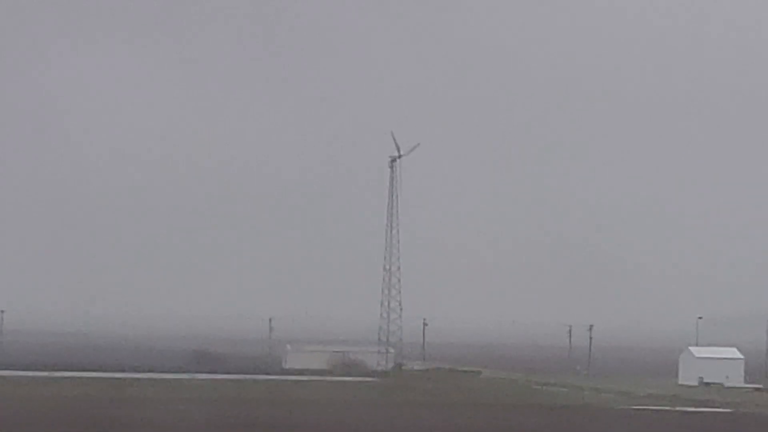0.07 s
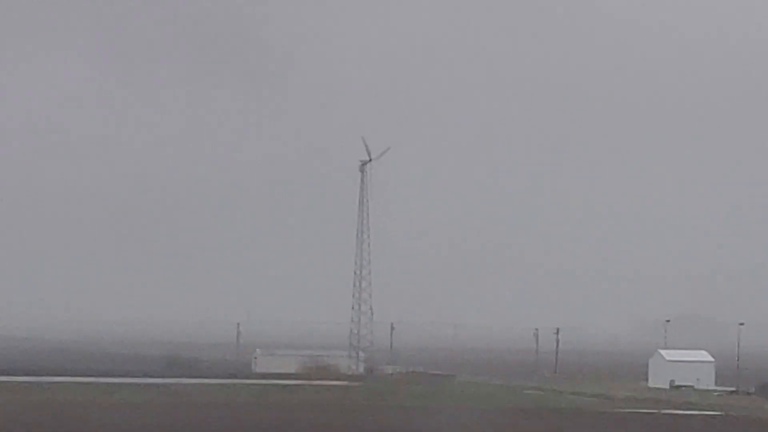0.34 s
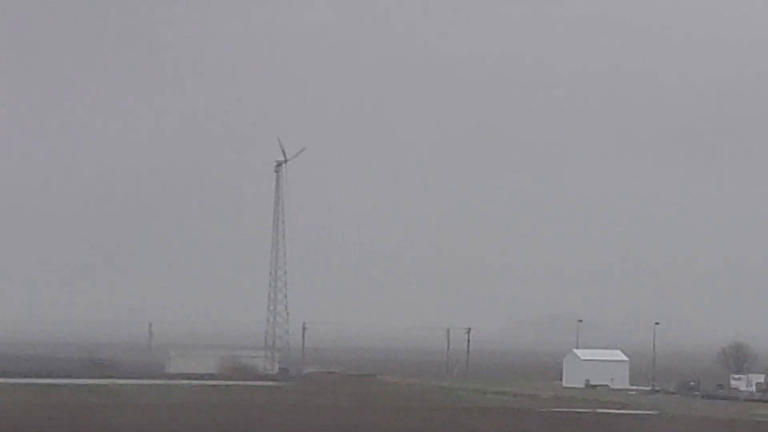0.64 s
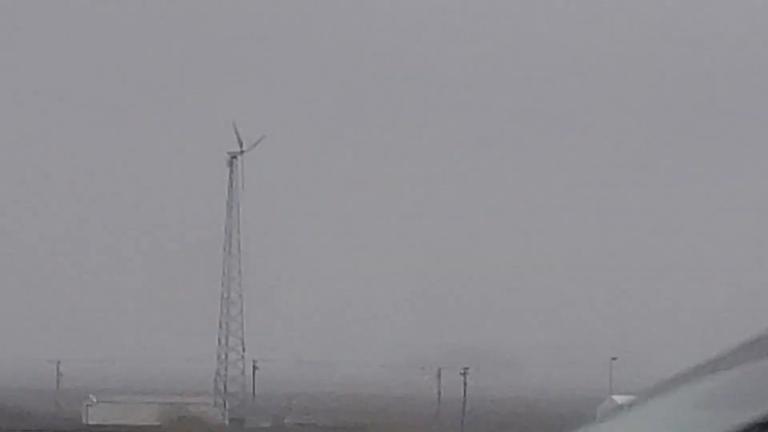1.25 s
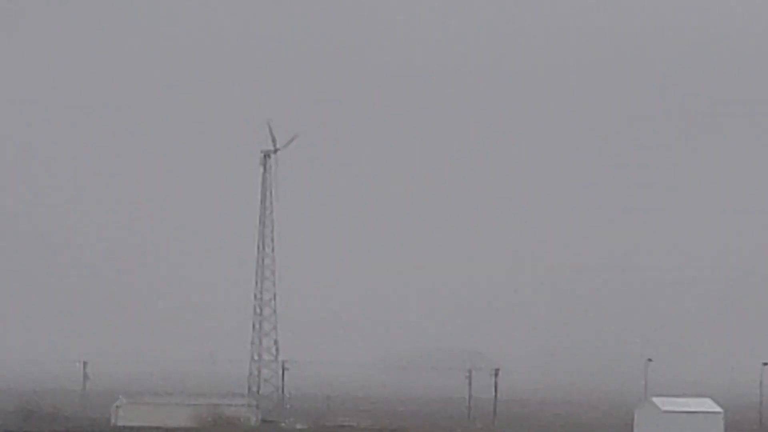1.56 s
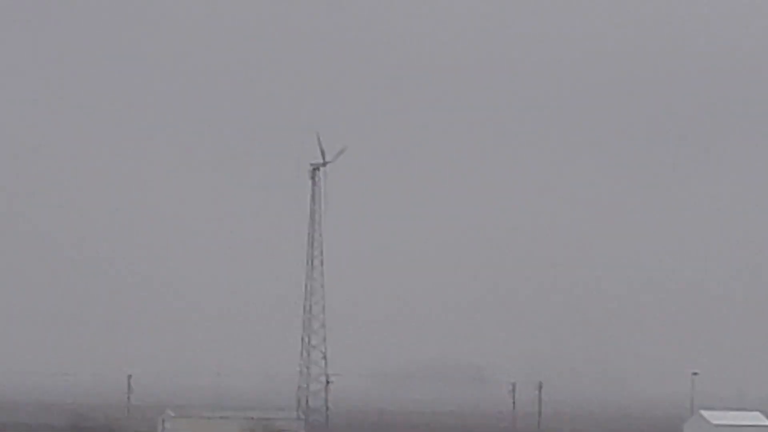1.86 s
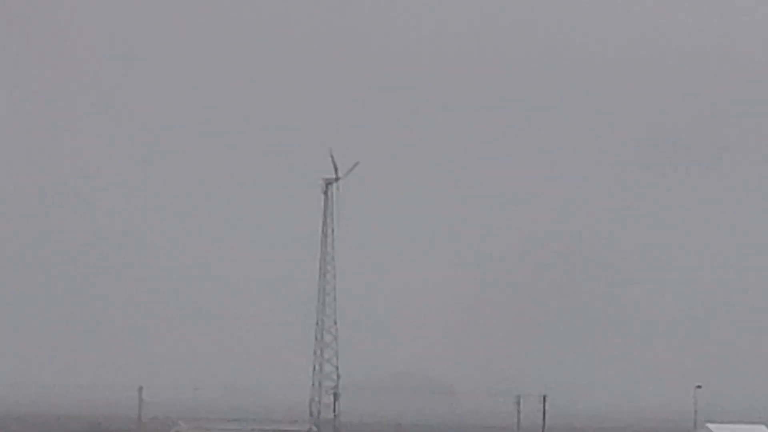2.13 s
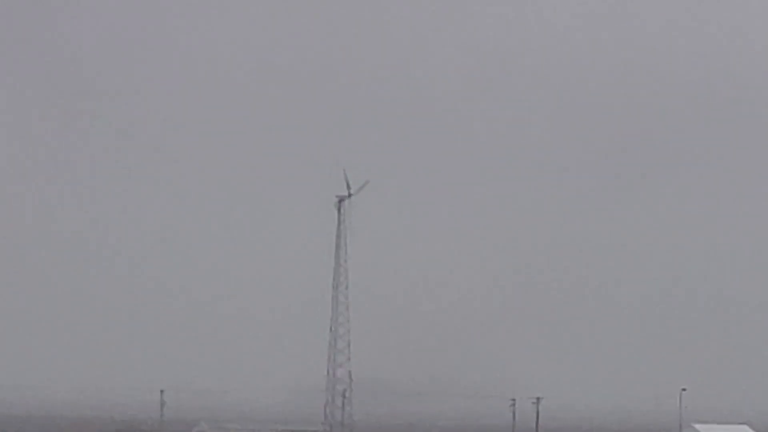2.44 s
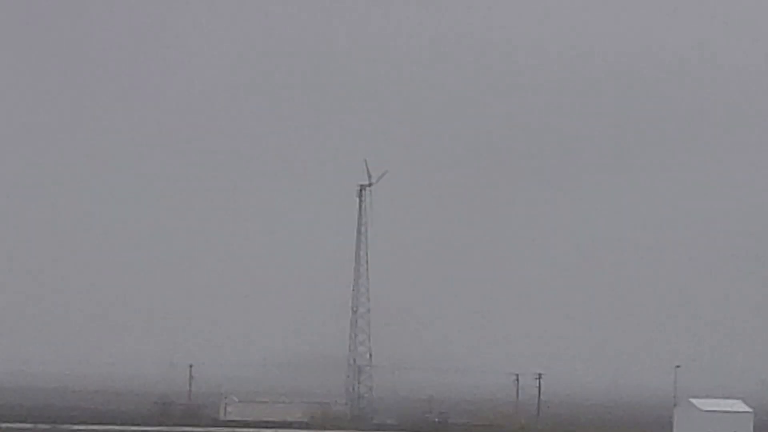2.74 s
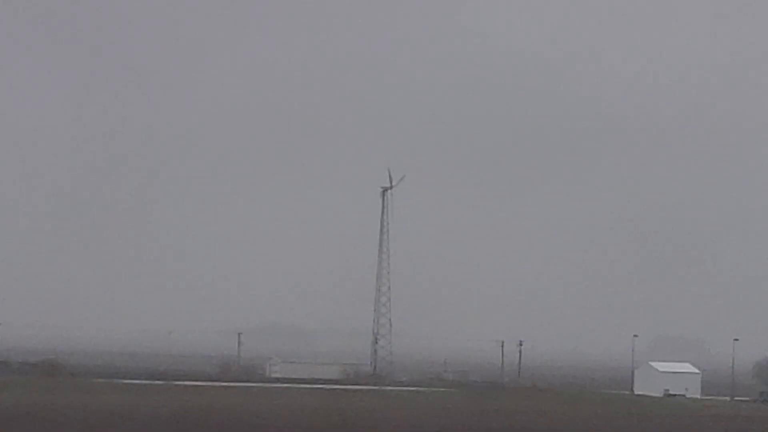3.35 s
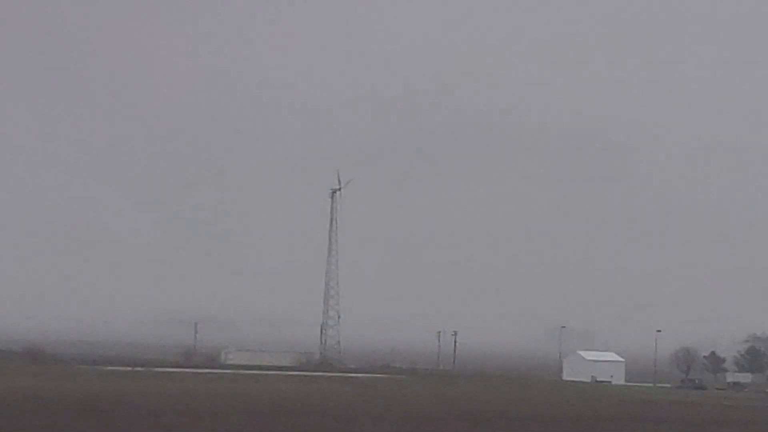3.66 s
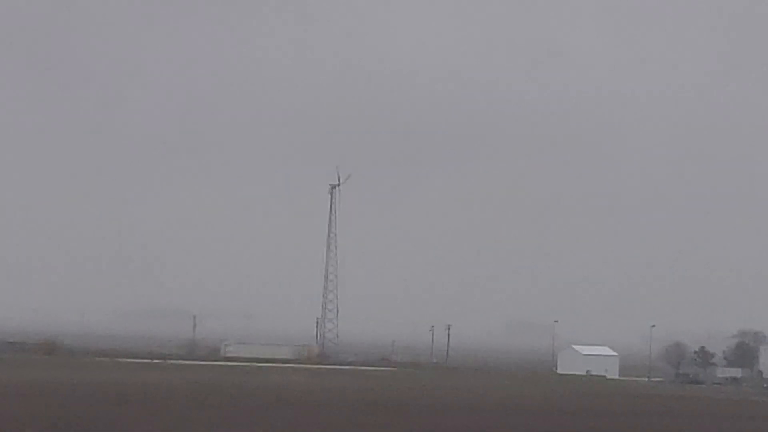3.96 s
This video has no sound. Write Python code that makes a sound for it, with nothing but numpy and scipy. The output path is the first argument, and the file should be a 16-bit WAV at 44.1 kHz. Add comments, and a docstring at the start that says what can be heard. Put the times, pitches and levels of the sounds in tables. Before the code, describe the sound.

A car's cabin rumbles at highway speed, with low bumps and a faint passing hiss.

```python
"""Highway cruise, inside the car

The road booms through the body, tyres roar in the cabin's resonances and air hisses along the side
window, over a faint engine drone. Another car slips past at about 1 s and lifts the hiss;
the airflow whistles faintly after it, and uneven road thumps the body again and again."""
import sys
import numpy as np
from scipy.fft import rfft, irfft, next_fast_len
from scipy.io import wavfile
from scipy.ndimage import map_coordinates

SR = 44100
rng = np.random.default_rng(int(sys.argv[2]) if len(sys.argv) > 2 else 0)


def transcribe(u):
    """Save the signal u as a 16-bit wav file named by the first command-line argument.

    u: samples, shape (n,) or (channels, n), limited to [-1, 1]; the rate is SR.
    q: integer samples, one column per channel.
    """
    v = np.clip(np.atleast_2d(u).T, -1, 1)
    q = np.round(v * 32767).astype(np.int16)
    wavfile.write(sys.argv[1], SR, q)


N = 176400

# Stereo image of the broad noises. Each row: frequency in Hz, left-right likeness from -1 to 1.
STEREO_LIKENESS = [(50, 1), (100, 0.97), (200, 0.94), (370, 0.93), (435, .45), (530, .72), (630, .25),
                   (800, 0.38), (950, -0.41), (1080, -0.59), (1250, -0.87), (1400, -.35), (1850, -0.4),
                   (2200, 0), (2800, .25), (3300, -.05), (5000, -0.014)]


def amp(db):
    """Decibels to gain."""
    return 10 ** (np.asarray(db) / 20)


def over_pitch(points, hz):
    """A curve through (Hz, value) points on a log frequency axis, read at hz."""
    point_hz, values = np.transpose(points)
    return np.interp(np.log(hz + 1), np.log(point_hz + 1), values)


def clock():
    """The time of each sample in seconds."""
    return np.arange(N) / SR


def fader(points):
    """A gain that rides through (seconds, dB) points."""
    return amp(np.interp(clock(), *np.transpose(points)))


def swell(peak_s, spread_s):
    """A bell-shaped rise and fall."""
    return np.exp(-.5 * ((clock() - peak_s) / spread_s) ** 2)


def wobble(knots_per_s):
    """A smooth random drift around zero."""
    return map_coordinates(rng.standard_normal(256), [clock() * knots_per_s], mode="wrap")


def filtered(x, response):
    """x through an equaliser whose gain is response(hz)."""
    size = next_fast_len(N + SR // 2)
    return irfft(rfft(x, size) * response(np.fft.rfftfreq(size, 1 / SR)), size)[..., :N]


def stereo_noise(gain, likeness):
    """Noise of rms 1; its gain and left-right likeness are functions of frequency."""
    def mid_side_gains(hz):
        angle = np.arccos(np.clip(likeness(hz), -1, 1)) / 2
        return gain(hz) * np.array([np.cos(angle), np.sin(angle)]).reshape(2, -1)
    mid, side = filtered(rng.standard_normal((2, N)), mid_side_gains)
    noise = np.array([mid + side, mid - side])
    return noise / np.sqrt(np.mean(noise ** 2) + 1e-20)


def rush(spectrum):
    """Broad stereo noise coloured by (Hz, relative dB) points."""
    return stereo_noise(lambda hz: amp(over_pitch(spectrum, hz)),
                        lambda hz: over_pitch(STEREO_LIKENESS, hz))


def ring(centre_hz, half_width_hz, likeness):
    """Stereo noise ringing in one resonance."""
    return stereo_noise(lambda hz: 1 / (1 + ((hz - centre_hz) / half_width_hz) ** 2),
                        lambda hz: likeness)


def engine(pitch_hz=83.75, drift=0.0085, waver_db=2):
    """The engine drones faintly at cruising speed, a little unsteady in pitch and level."""
    # Engine orders. Each row: multiple of the pitch, level in dB.
    orders = [(1, -36.5), (2, -41)]
    phase = 2 * np.pi * np.cumsum(pitch_hz * (1 + drift * wobble(3.18))) / SR
    return sum(amp(db + waver_db * wobble(5.9)) * np.sqrt(2) * np.sin(k * phase) for k, db in orders)


def window_air(flutter_db=1.0):
    """Turbulent air hisses along the glass and breaks into brief, breathy whistles."""
    # Colour of the hiss. Each row: frequency in Hz, relative level in dB.
    colour = [(1000, -18), (2300, -3), (2850, 5.5), (3300, 5), (3700, 4), (4500, -2), (5500, -6.5),
              (6700, -11), (7700, -24), (8500, -20), (9500, -18), (11200, -15), (13000, -25.5),
              (14000, -37.5), (15500, -65.5)]
    # Strength of the hiss. Each row: time in seconds, level in dB.
    airflow = [(0, -59), (.5, -56), (.8, -56.5), (1.7, -52), (2.1, -54.5), (2.6, -53), (3, -54),
               (3.4, -53.5), (4, -53.5)]
    # Airflow whistles. Each row: peak time in seconds, spread in seconds, pitch in Hz, level in dB.
    whistles = [(0.912, 0.016, 3380, -52.5), (1.743, 0.06, 3060, -58), (2.09, 0.085, 2880, -53),
                (2.275, 0.045, 2820, -55)]
    hiss = fader(airflow) * amp(flutter_db * wobble(12)) * rush(colour)
    return hiss + sum(amp(db) * swell(peak_s, spread_s) * ring(hz, half_width_hz=45, likeness=0.51)
                      for peak_s, spread_s, hz, db in whistles)


def tread_hum():
    """A hollow band of tyre noise grows as the surface changes."""
    # Strength of the hum. Each row: time in seconds, level in dB.
    levels = [(0, -56), (1, -49), (2, -49.5), (2.9, -49), (3.35, -41.5), (3.55, -46.5), (3.9, -39.5),
              (4, -42.5)]
    return fader(levels) * ring(centre_hz=982, half_width_hz=160, likeness=-0.065)


def coarse_patches(centre_hz=335, half_width_hz=81):
    """The tyres' low roar swells over coarser patches of road."""
    # Swells of the low roar. Each row: time in seconds, level in dB.
    levels = [(0, -37), (.4, -36.5), (.65, -48), (.87, -34.5), (1.2, -45), (1.5, -37.5), (1.66, -31),
              (1.85, -38.5), (2.33, -34), (2.45, -41.5), (2.65, -32.5), (2.9, -45), (3.08, -30.5),
              (3.25, -35), (3.55, -37), (3.8, -33), (4, -35.5)]
    roar = stereo_noise(lambda hz: 1 / (1 + ((hz - centre_hz) / half_width_hz) ** 4),
                        lambda hz: over_pitch(STEREO_LIKENESS, hz))
    return fader(levels) * roar


def tyre_roar(roar_db=-25.5, cabin_trim_db=0.37, crossover_hz=1300, dulling_db_per_s=0.76):
    """The treads roar on the road and the cabin's resonances ring along; the top slowly dulls."""
    # Colour of the roar. Each row: frequency in Hz, relative level in dB.
    colour = [(60, -17.5), (130, -1.5), (190, -1), (225, -4), (300, -8), (385, -11), (425, -10.5),
              (560, -13), (750, -17.5), (1000, -23.5), (1500, -24.5), (2000, -27), (2450, -33.5),
              (2750, -37), (3300, -45), (4400, -43.5), (5500, -54.5), (8000, -77.5), (12000, -110)]
    # Cabin resonances. Each row: pitch in Hz, half width in Hz, level in dB before the trim,
    # left-right likeness.
    resonances = [(359, 12, -41.5, 0.63), (527, 19, -42.5, .85), (675.5, 13, -45, 0.49),
                  (878, 28, -46, -0.19), (1150, 47, -45.5, -0.87), (1369, 30, -54, .3),
                  (1475, 35, -57, -1.1), (1567, 29, -55, .3), (1699, 11, -56, -0.087),
                  (1860, 70, -56, -0.96), (2279, 49, -56.5, 0.29), (2396, 45, -62, -0.085)]
    roar = amp(roar_db) * rush(colour)
    roar += sum(amp(db + cabin_trim_db) * ring(hz, half_width_hz, likeness)
                for hz, half_width_hz, db, likeness in resonances)
    top = filtered(roar, lambda hz: 1 - 1 / (1 + (hz / crossover_hz) ** 6))
    dulling = amp(dulling_db_per_s * (clock().mean() - clock()))
    return roar - top + top * dulling


def body_rumble():
    """The road shakes the body, more on rougher stretches, and sets its lowest resonance booming."""
    # Colour of the rumble. Each row: frequency in Hz, relative level in dB.
    colour = [(12, -31), (20, -29), (31, -20), (40, -2.5), (48, -7), (58, -1), (68, -5.5), (80, -2),
              (93, -1.5), (104, -8.5), (116, -6), (135, -22), (200, -44), (400, -81)]
    # Roughness of the road. Each row: time in seconds, rumble level in dB.
    roughness = [(0, -19.5), (.8, -19.5), (1, -17.5), (1.3, -20), (1.55, -19.5), (2.4, -20), (2.75, -21),
                 (3.1, -17), (3.25, -18), (3.6, -20), (4, -14.5)]
    # Swells of the boom. Each row: time in seconds, level in dB.
    boom_levels = [(0, -50.5), (.6, -23.5), (1, -26.5), (1.55, -23.5), (1.85, -15.5), (2.25, -21.5),
                   (2.45, -30.5), (3.15, -35), (3.5, -17), (4, -38)]
    rumble = fader(roughness) * rush(colour)
    boom = fader(boom_levels) * ring(centre_hz=47.56, half_width_hz=3.1, likeness=1.0)
    return rumble + boom


def road_bumps(rise_s=0.019):
    """Each bump in the road knocks the body: one low thump that swells and dies."""
    # Thumps. Each row: start in seconds, peak level in dB, pitch in Hz.
    bumps = [(0.128, -11, 66.5), (0.231, -12.5, 72.7), (0.674, -8.5, 77), (1.124, -13.5, 70),
             (1.2, -8.5, 73.4), (1.333, -7.5, 71.5), (1.552, -13, 77.4), (1.756, -15, 67),
             (2.093, -12, 79.4), (2.163, -16.5, 74.7), (2.569, -13.5, 94), (2.84, -12, 71.4),
             (2.97, -5.5, 59.2), (3.281, -7.5, 73), (3.5, -9.5, 63.5)]
    thumps = np.zeros(N)
    for start_s, db, hz in bumps:
        age = np.maximum(clock() - start_s, 0)
        envelope = (age / rise_s * np.exp(1 - age / rise_s)) ** 2
        thumps += amp(db) * envelope * np.sin(2 * np.pi * hz * age)
    return thumps


def passing_car(middle_s=1.07, half_length_s=0.42, edge_s=0.067, hiss_db=-52.5, flutter_db=1.0):
    """A car's rush rises, holds while it is alongside and fades; tyre hiss and a low drone trail it."""
    # Colour of the pass-by. Each row: frequency in Hz, relative level in dB.
    colour = [(500, -2), (1500, 1), (2500, 3), (3400, -1), (4500, 1), (6000, -6.5), (7000, -14),
              (8000, -25.5), (9500, -15), (11700, -16), (14000, -33.5), (15500, -52)]
    alongside = 1 / (1 + np.exp((np.abs(clock() - middle_s) - half_length_s) / edge_s))
    hiss = alongside * amp(hiss_db + flutter_db * wobble(10)) * rush(colour)
    tyre_band = ring(centre_hz=2640, half_width_hz=280, likeness=0.3)
    trail = amp(-54) * swell(peak_s=1.52, spread_s=0.3) * tyre_band
    drone = ring(centre_hz=162, half_width_hz=22, likeness=0.94)
    wake = amp(-27) * swell(peak_s=1.536, spread_s=0.087) * drone
    return hiss + trail + wake


def scene():
    """Everything heard in the cabin."""
    road = body_rumble() + road_bumps() + tyre_roar() + coarse_patches() + tread_hum()
    return road + engine() + window_air() + passing_car()


def record(dry):
    """Two microphone ports each colour their own side; the very top is cut off."""
    # Lean of the stereo image. Each row: frequency in Hz, left minus right in dB.
    balance = [(300, 0), (700, 0.5), (850, 8), (1000, -2), (1150, 4), (1500, -1), (2000, 3), (3000, 0),
               (3600, 5.5), (4300, -3.5), (6300, -4), (7500, 3), (8500, 8.5), (9400, 1.5), (11000, -12),
               (13000, -8.5), (15000, -2)]
    top_hz = 15700

    def ports(hz):
        gains = amp(np.outer([.5, -.5], over_pitch(balance, hz)))
        equal_power = gains / np.sqrt(np.mean(gains ** 2, axis=0))
        return equal_power * (hz < top_hz)
    return filtered(dry, ports)


dry = scene()
out = record(dry)
transcribe(out)
```